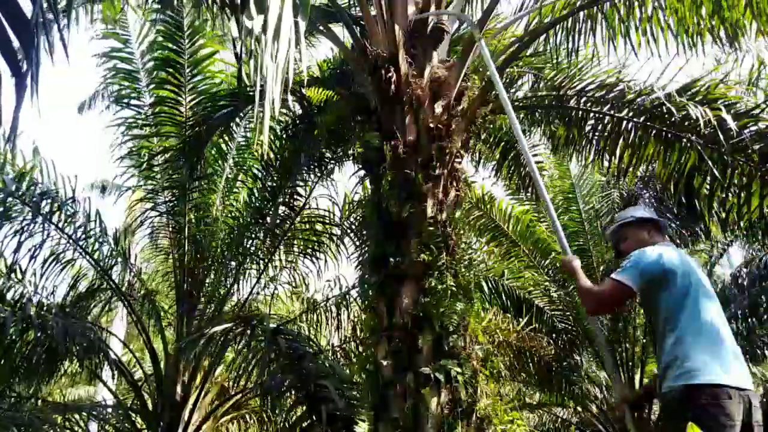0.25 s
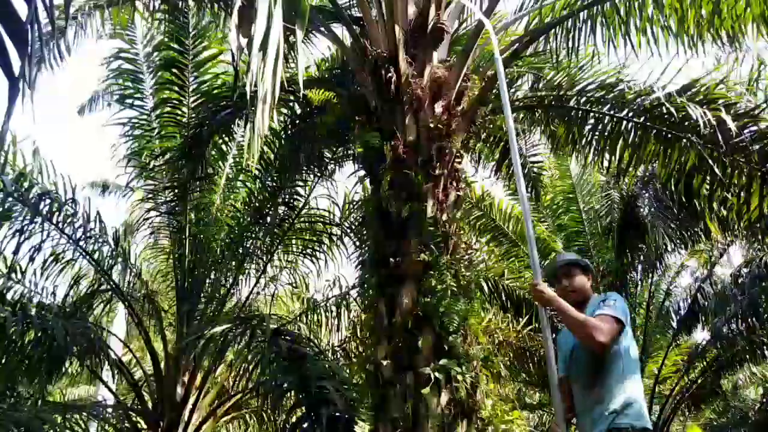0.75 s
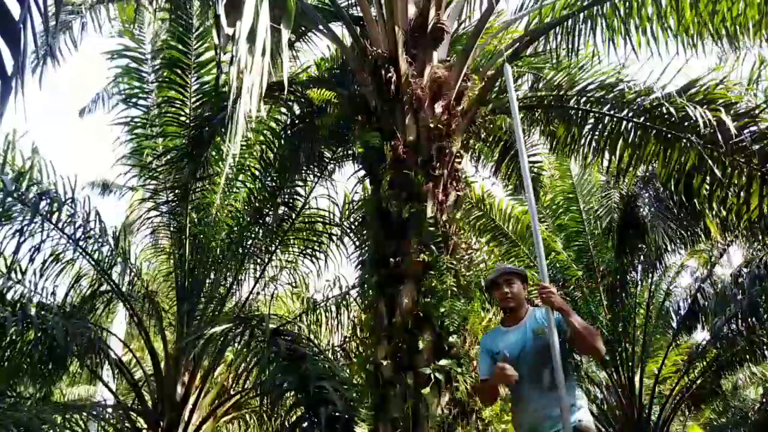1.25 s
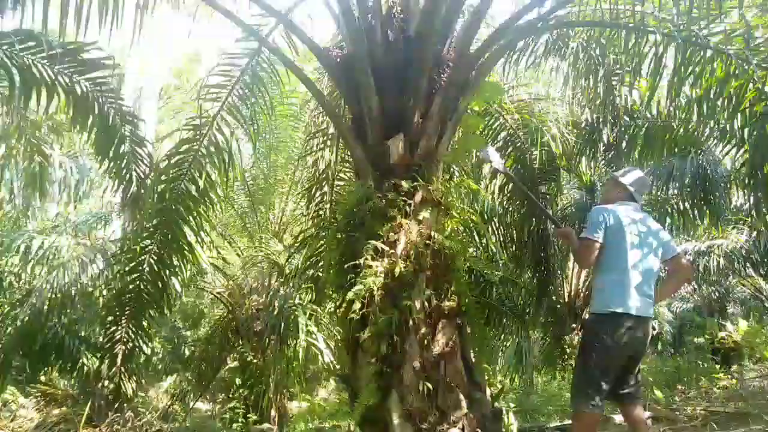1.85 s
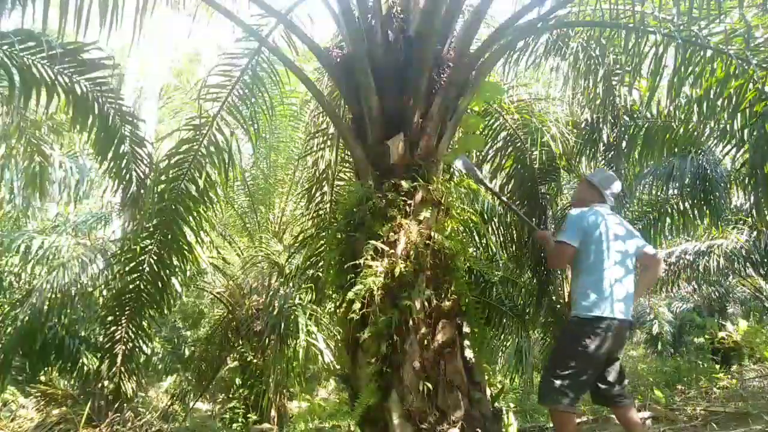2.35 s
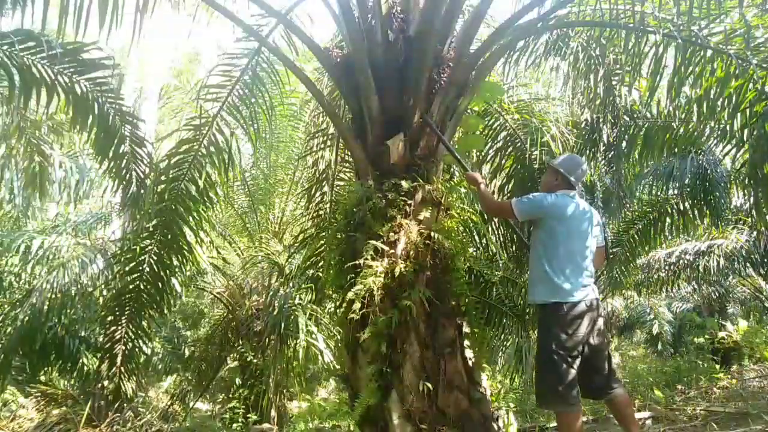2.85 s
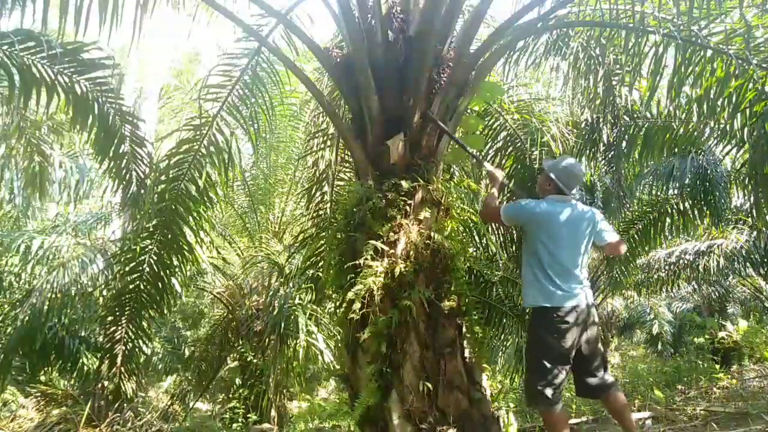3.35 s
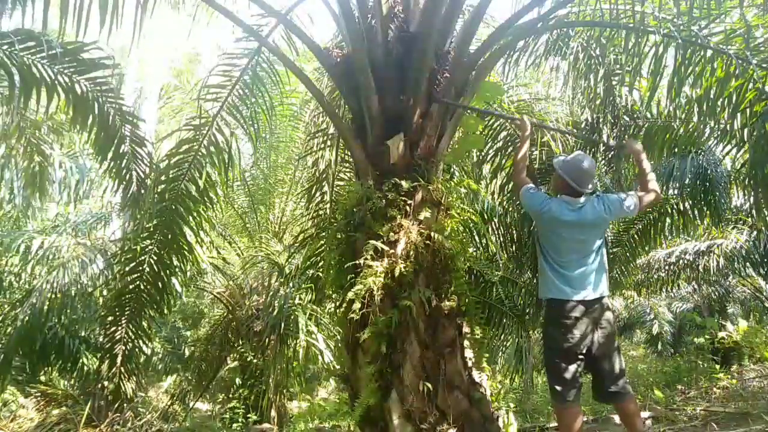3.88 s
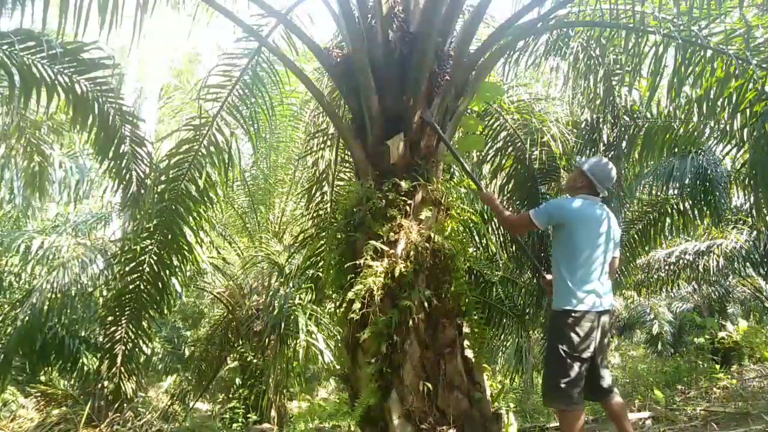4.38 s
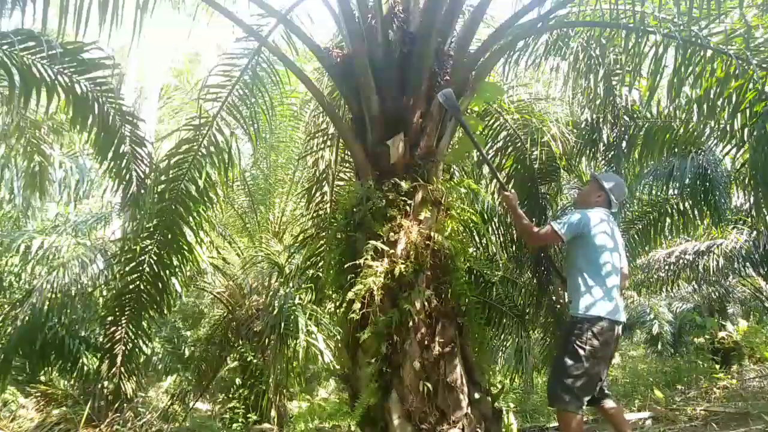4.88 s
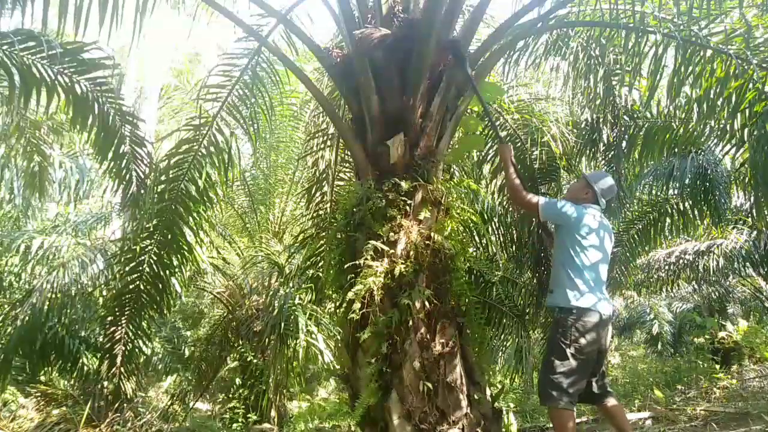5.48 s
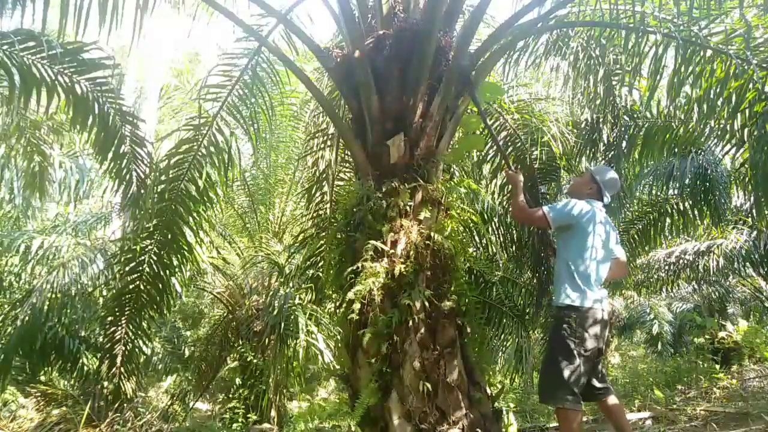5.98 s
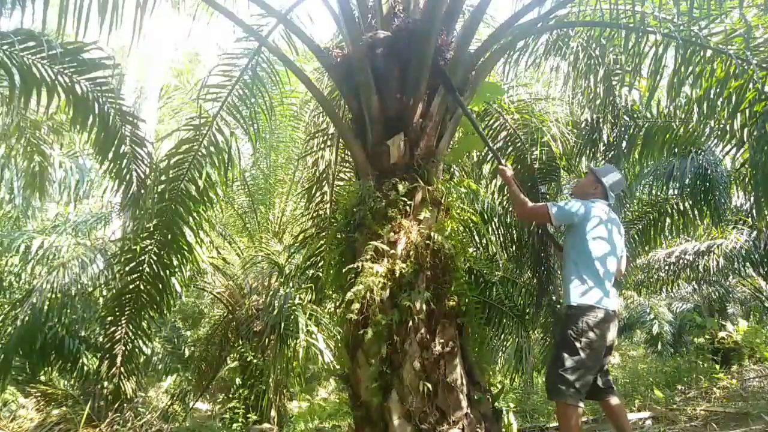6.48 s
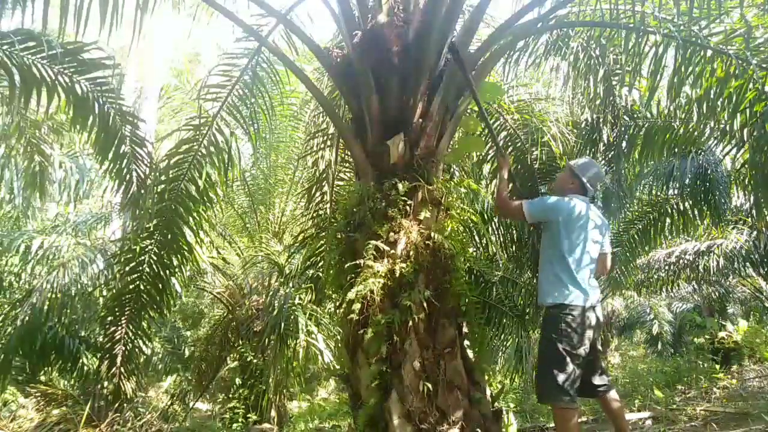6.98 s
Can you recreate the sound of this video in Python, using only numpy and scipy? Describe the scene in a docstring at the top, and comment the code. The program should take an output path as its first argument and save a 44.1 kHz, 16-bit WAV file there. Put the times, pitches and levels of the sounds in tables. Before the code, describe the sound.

Leafy rustling with thumps and a brief metallic clank cuts to near quiet, then a loud fibrous crunch, sharp cracks and frond swishes.

```python
"""Dry palm fronds hiss, scrape and crackle, built from random grains, as a long pole harvests two oil palms.
At the first tree a sickle pole is tugged down, with footfalls and a ringing knock of its metal tube.
Abruptly at the second, a chisel is driven into stalks: noise bursts crunch and crack, damped modes thud.
There the shaft's modes sing, a short bright tail answers the blows and two sines drone as a far engine.
Faint gliding tones whistle now and then, and each tree has its own bed of shaped noise."""
import sys
import numpy as np
from scipy import signal
from scipy.fft import rfft, irfft, next_fast_len
from scipy.io import wavfile

SR = 44100
rng = np.random.default_rng(int(sys.argv[2]) if len(sys.argv) > 2 else 0)


def wav_record(signal):
    """Record a signal, one row per channel, as 16-bit PCM in the file named by sys.argv[1]."""
    frames = np.transpose(np.atleast_2d(signal))
    bounded = np.clip(frames, -1, 1)
    # unit amplitude maps onto the largest positive 16-bit level
    quanta = np.round(bounded * 32767).astype(np.int16)
    wavfile.write(sys.argv[1], SR, quanta)


N = 318843
TIME = np.arange(N) / SR
CUT_S = 2.108   # the first tree gives way to the second


def from_db(db):
    """Decibels to gain."""
    return 10 ** (np.asarray(db) / 20)


def rms_one(x):
    """Scale a signal to rms 1."""
    return x / np.sqrt(np.mean(x ** 2) + 1e-20)


def at_hz(points, hz):
    """Read a table on a log-frequency axis."""
    points = np.array(points)
    return np.interp(np.log(hz + 1), np.log(points[:, 0]), points[:, 1])


def drift(rate):
    """Random drift: straight lines between knots of spread 1, at `rate` knots per second."""
    knots = rng.standard_normal(4000)
    return np.interp(TIME * rate, np.arange(len(knots)), knots)


def add(out, s, sound):
    """Mix a sound in at time s."""
    start = int(s * SR)
    out[:, start:start + sound.shape[-1]] += sound[..., :N - start]


# how alike left and right are: f/Hz, correlation (0 to 1)
STEREO_LIKENESS = [(900, 0.74), (3000, 0.22), (14000, 0.066)]


def spread(pair, gain_at):
    """Colour two unrelated signals and mix them to stereo, alike in the bass and apart in the treble; rms 1."""
    size = next_fast_len(pair.shape[-1])
    hz = np.fft.rfftfreq(size, 1 / SR)
    mid, side = rfft(pair, size) * gain_at(hz)
    alike = at_hz(STEREO_LIKENESS, hz)
    both = np.sqrt(1 + alike) * mid + np.sqrt(1 - alike) * side * [[1], [-1]]
    return rms_one(irfft(both, size)[:, :pair.shape[-1]])


def coloured(pair, spectrum):
    """Stereo sound with the given spectrum, rms 1."""
    return spread(pair, lambda hz: from_db(at_hz(spectrum, hz)))


def grains(per_s):
    """Tiny snaps at random moments, with normally distributed strengths drawn separately for two channels."""
    return (rng.random(N) < per_s / SR) * rng.standard_normal((2, N))


def resonance(hz, centre_hz, q):
    """Response of one damped resonance, 1 at its top."""
    return 1 / (1 + 1j * q * (hz / centre_hz - centre_hz / (hz + 1)))


def burst(gain_at, t60, rise_s):
    """A cascade of breaking fibres: coloured noise that rises fast and dies away."""
    t = np.arange(SR // 3) / SR
    noise = spread(rng.standard_normal((2, len(t))), gain_at)
    shape = from_db(-60 * t / t60) * (1 - np.exp(-t / rise_s))
    return rms_one(noise * shape) * np.sqrt(np.mean(shape ** 2))


def tick(gain_at, size=1024):
    """One clean fracture: a single pulse through the given response, peak 1."""
    pulse = irfft(gain_at(np.fft.rfftfreq(size, 1 / SR)))[:size // 2]
    return pulse / abs(pulse).max()


def ring(hz, t60):
    """One struck mode: a sine that starts at rms 1 and dies away."""
    t = np.arange(SR // 2) / SR
    return np.sqrt(2) * np.sin(2 * np.pi * hz * t) * from_db(-60 * t / t60)


def metal(hits, modes, t60):
    """Every knock sets all the modes ringing, each with a strength and a moment of its own."""
    out = np.zeros((2, N))
    for s, db in hits:
        for mode_hz, mode_db in modes:
            strength_db = db + mode_db + rng.normal(0, 4.4)
            delay_s = rng.random() / mode_hz   # up to one period
            add(out, s + delay_s, from_db(strength_db) * ring(mode_hz, t60))
    return out


def lean_left(x, lean_db, centre_hz=5200):
    """The treble around the centre is stronger on the left than on the right."""
    treble = signal.lfilter(*signal.iirpeak(centre_hz, 1.1, fs=SR), x)
    return x + treble * (from_db([[lean_db / 2], [-lean_db / 2]]) - 1)


def from_one_side(x, lag_s):
    """Sound from one side reaches the far channel late: the left for a positive lag, the right for a negative."""
    half = int(round(lag_s * SR / 2))
    return np.array([np.roll(x[0], half), np.roll(x[1], -half)])


# background spectrum at the first tree: f/Hz, relative level/dB per Hz
FIRST_BED = [(30, -23.5), (95, -3.5), (350, -22.5), (1500, -54.5), (5000, -35), (14000, -64.5)]


def first_air(level_db):
    """Steady noise bed of the first tree, shaped by its spectrum."""
    return from_db(level_db) * coloured(rng.standard_normal((2, N)), FIRST_BED)


# background spectrum at the second tree: f/Hz, relative level/dB per Hz
SECOND_BED = [(30, -28), (65, 1.5), (115, 6.5), (170, 1), (250, -13.5), (430, -43), (5000, -38),
              (9000, -47.5)]


def second_air(level_db):
    """Steady noise bed of the second tree, shaped by its spectrum."""
    return from_db(level_db) * coloured(rng.standard_normal((2, N)), SECOND_BED)


# far engine: t/s, f/Hz of its second harmonic, relative level/dB of that harmonic
ENGINE_COURSE = [(2.097, 143.8, -59), (5.499, 150.2, -51), (7.23, 152.5, -48.5)]


def engine(firing_db, second_db, waver_db):
    """Only the two lowest harmonics of the far engine carry through the trees."""
    s, hz, db = np.transpose(ENGINE_COURSE)
    phase = np.pi * np.cumsum(np.interp(TIME, s, hz)) / SR   # runs at half the second harmonic
    firing = from_db(firing_db + waver_db * drift(1.5)) * np.sin(phase)
    second_level_db = np.interp(TIME, s, db) + second_db + waver_db * drift(11)
    second = from_db(second_level_db) * np.sin(2 * phase)
    return np.sqrt(2) * (firing + second)


def grove(x, wet_db, t60, treble_t60):
    """Trunks and leaves scatter a thin, bright tail whose top dies first."""
    t = np.arange(SR * 3 // 4) / SR
    tails = [([(100, 3.0), (700, -5.0), (5000, 3.0), (9000, 0.0)], t60),
             ([(2000, -38.5), (5000, -9.5), (14000, -16.0)], treble_t60)]
    echo = 0
    for colour, decay in tails:
        echo = echo + coloured(rng.standard_normal((2, len(t))), colour) * from_db(-60 * t / decay)
    echo = echo * (1 - np.exp(-t / 0.00049))
    return from_db(wet_db) * signal.fftconvolve(x, rms_one(echo) / np.sqrt(len(t)), axes=1)[:, :N]


# faint whistles: t/s, length/s, starting f/Hz, share by which the pitch climbs, relative level/dB
FAINT_WHISTLES = [(0.137, 0.036, 1660, 0.079, -42), (3.916, 0.095, 761, 0.12, -61),
                  (4.189, 0.28, 1918, 0.06, -60.5), (5.149, 0.035, 1860, -0.042, -57)]


def whistles(waver, flicker_db):
    """Faint whistles, perhaps a far bird: thin, rough tones that glide a little, waver and break up."""
    out = np.zeros((2, N))
    for start, length, hz, glide, db in FAINT_WHISTLES:
        size = int(length * SR)
        climb = glide * np.sin(np.linspace(0, np.pi / 2, size))
        pitch = hz * (1 + climb + waver * drift(409)[:size])
        gain = rms_one(from_db(flicker_db * drift(86.2)[:size])) * signal.windows.tukey(size, 1 / 4)
        tone = np.sqrt(2) * np.sin(2 * np.pi * np.cumsum(pitch) / SR)
        add(out, start, from_db(db) * gain * tone)
    return out


# knocks on the metal tube: t/s, relative level/dB
TUBE_HITS = [(0.8378, -18), (0.843, -20), (0.912, -26.5)]
# modes of the tube: f/Hz, relative level/dB
TUBE_MODES = [(770, -21.5), (904, -16.5), (1368, -15), (1452, -16), (1630, -8.5), (1775, -13.5),
              (1900, -17.5), (2545, -9.5), (2995, -8.5), (3526, -11.5)]
# the tube is already ringing at the start: f/Hz, level/dB, t60/s
TUBE_LINGERING = (2923, -40.5, 0.48)


def pole(ring_t60, clatter_db, clatter_t60):
    """The blade clatters against the woody stalk and the tube rings briefly; one mode rings from the start."""
    out = metal(TUBE_HITS, TUBE_MODES, ring_t60)
    for s, db in TUBE_HITS:
        clatter = burst(lambda hz: resonance(hz, 1950, 0.61) ** 2, clatter_t60, 0.00035)
        add(out, s, from_db(db + clatter_db) * clatter)
    hz, db, t60 = TUBE_LINGERING
    add(out, 0, from_db(db) * ring(hz, t60))
    return out


# the chisel knocks against the trunk: t/s, relative level/dB
TRUNK_HITS = [(4.508, -55), (4.553, -53.5)]
# modes of its steel shaft, also sung by scraping(): f/Hz, relative level/dB
SHAFT_MODES = [(1540, -1.5), (2008, 3), (2915, 3)]


def chisel_knocks(t60):
    """The chisel meets the trunk and its steel shaft rings in a few modes."""
    return metal(TRUNK_HITS, SHAFT_MODES, t60)


def scraping(levels, slips_per_s, shaft_db, shaft_q, hollow_db, hollow_hz, hollow_q):
    """The chisel grates along the stalk in uneven slips: its shaft sings and the thick stalk base groans."""
    _, stalk, drag = levels
    slips = grains(slips_per_s)

    def shaft_response(hz):
        return sum(from_db(db) * resonance(hz, mode_hz, shaft_q) for mode_hz, db in SHAFT_MODES)
    shaft = spread(slips, shaft_response)
    hollow = spread(slips, lambda hz: resonance(hz, hollow_hz, hollow_q) ** 2)
    return from_db(stalk + shaft_db) * shaft + from_db(drag + hollow_db) * hollow


def taps(per_s, low_hz, high_hz, q, count=20):
    """Stalks bump together at random; each tap rings briefly at a woody pitch of its own; rms 1."""
    bumps, dealt = grains(per_s)[0], rng.integers(0, count, N)
    out = 0
    for k, hz in enumerate(np.geomspace(low_hz, high_hz, count)):
        struck = bumps * (dealt == k) + 1e-18
        out = out + signal.lfilter(*signal.iirpeak(hz, q, fs=SR), struck) / np.sqrt(hz)
    return rms_one(out)


def blows(rows, level_db, ring_db, q, t60, rise_s, dull_hz):
    """Soft, heavily damped blows: a few swings of one mode, and a dull crush around it."""
    out = np.zeros((2, N))
    for s, db, pitch_hz in rows:
        def colour(hz):
            return resonance(hz, pitch_hz, q) / (1 + (hz / dull_hz) ** 2)
        add(out, s, from_db(db + level_db) * burst(colour, t60, rise_s).mean(axis=0))
        swings = ring(pitch_hz, t60)
        add(out, s, from_db(db + ring_db) * swings * (1 - np.exp(-TIME[:len(swings)] / rise_s)))
    return out


# heavy thumps of feet and trunk: t/s, relative level/dB, f/Hz
THUMP_ROWS = [(0.287, -18.5, 86), (0.643, -23, 114), (0.842, -21, 97), (1.065, -19, 82.5), (1.84, -31, 104),
              (5.306, -25, 200), (5.735, -27.5, 260)]


def thumps():
    """Feet and trunk thump low: damped swings with little above the bass."""
    return blows(THUMP_ROWS, level_db=0.5, ring_db=-0.4, q=4, t60=0.083, rise_s=0.004, dull_hz=300.4)


# dull blows of pole and stalks: t/s, relative level/dB, f/Hz
KNOCK_ROWS = [(0.284, -16, 217), (0.282, -20, 557), (0.453, -21.5, 624), (0.645, -17, 950),
              (1.06, -13.5, 390), (1.562, -31.5, 672), (1.85, -28.5, 910), (1.926, -22.5, 596),
              (2.578, -0.5, 420), (2.826, -14.5, 390), (2.842, -14, 358), (3.641, -17.5, 526),
              (4.505, -20, 522), (4.555, -18, 243), (5.302, -3, 601), (5.313, -11, 356), (5.334, -23, 1130),
              (5.593, -20.5, 442), (5.726, -14, 1195), (5.736, -18, 516), (6.301, -27.5, 400),
              (6.354, -24, 266), (6.414, -24, 730), (6.574, -16.5, 284), (6.631, -18, 303),
              (7.216, -15.5, 800)]


def knocks():
    """Pole and stalks knock dully: short, woody swings in a crush of noise."""
    return blows(KNOCK_ROWS, level_db=-5.0, ring_db=-7, q=2.4, t60=0.038, rise_s=0.0054, dull_hz=1900)


# the chisel bursts through a stalk in jerks: t/s, relative level/dB, t60/s
CRUNCH_JERKS = [(2.539, -17.5, 0.08), (2.554, -13.5, 0.095), (2.579, -11, 0.039), (2.588, -10.5, 0.055),
                (2.599, -5.5, 0.021), (2.607, -19.5, 0.072)]
# spectrum of the crunch: f/Hz, relative level/dB per Hz
CRUNCH_SPECTRUM = [(45, -35.5), (85, -13), (230, -14.5), (330, -0.5), (470, -7), (950, -13.5), (1900, -9.5),
                   (4000, -11), (15000, -29.5)]


def crunch():
    """Wet, fibrous wood gives way in a quick run of bursts."""
    out = np.zeros((2, N))
    for s, db, t60 in CRUNCH_JERKS:
        jerk = burst(lambda hz: from_db(at_hz(CRUNCH_SPECTRUM, hz)), t60, 0.0017)
        add(out, s, from_db(db + 1.5) * jerk)
    return out


# fibres snapping: t/s, relative level/dB, f/Hz
FIBRE_SNAPS = [(0.2139, -14.5, 990), (0.4268, -20, 5400), (2.052, -23.5, 5520), (2.826, -23, 2148),
               (2.8449, -21, 2154), (3.366, -29, 2120), (3.4305, -30, 2750), (3.5544, -25.5, 2980),
               (3.615, -10, 2180), (3.619, -23, 1800), (3.8072, -28.5, 2600), (4.337, -35, 3980),
               (4.4155, -28.5, 1050), (4.506, -34, 2290), (4.552, -26, 2270), (5.0445, -35, 2460),
               (5.3015, -9.5, 1430), (5.312, -8.5, 2150), (5.3357, -11.5, 5900), (5.4499, -12, 2153),
               (5.5249, -13.5, 2540), (5.7333, -9, 1470), (6.6653, -12, 2220), (6.796, -20.5, 3400),
               (6.8403, -14.5, 1490), (6.9742, -13, 5500), (6.992, -14.5, 2370), (7.0267, -6.5, 2500),
               (7.219, -7, 3340)]


def cracks(level_db, q, splinter_db, splinter_hz, snap_db, t60, gap_s, count=4):
    """Snaps ring the stalk and throw off splinters; high-pitched dry fibres part in a run of sharp ticks."""
    out = np.zeros((2, N))
    for s, db, pitch_hz in FIBRE_SNAPS:
        def colour(hz):
            splinters = from_db(splinter_db) * resonance(hz, splinter_hz, 1)
            return resonance(hz, pitch_hz, q) ** 2 + splinters
        add(out, s, from_db(db + level_db) * burst(colour, t60, 0.0012))
        if pitch_hz <= 2150:
            continue
        for k, delay in enumerate(np.cumsum(gap_s * rng.uniform(0.62, 1.8, count))):
            gain = from_db(db + snap_db - 3.4 * k) * rng.choice([-1, 1])
            add(out, s + delay, gain * tick(colour))
    return out


def haul(s, length, db, slackening):
    """Gain of one haul: it takes up quickly, slackens or builds while it lasts, then the frond settles."""
    attack_s, release_db_per_s = 0.032, 148
    t = TIME - s
    fall_db = slackening * np.clip(t, 0, length) + release_db_per_s * np.maximum(t - length, 0)
    return np.clip(t / attack_s, 0, 1) * from_db(db - fall_db)


def tug(s, db, rise_s):
    """Gain of one tug: the frond speeds up, then springs to rest."""
    release_db_per_s = 225.5
    t = TIME - s
    return np.clip(1 + t / rise_s, 0, 1) * from_db(db - release_db_per_s * np.maximum(t, 0))


# a frond is hauled and keeps moving: t/s, length/s, leaflet hiss level/dB,
# slackening/(dB/s, negative builds), stalk scrape and dull dragging level/dB above the hiss
FROND_HAULS = [(0, 1.11, -49.5, -1.5, 1, 0.5), (1.128, 0.23, -62, -2.5, -3, 8.5),
               (1.544, 0.1, -60.5, 22, -3.5, 6.5), (1.746, 0.33, -55.5, -13.5, -4, 0.5),
               (3, 0.29, -72.5, -25, -19, -37), (3.375, 0.37, -56, -3, 5, 12.5),
               (3.577, 0.2, -39.5, 51, 4, -0.5), (3.84, 0.36, -57, 9, -3.5, -38),
               (4.228, 0.39, -58, -5.5, -1.5, -1.5), (4.637, 0.38, -63, 11.5, -12, -21.5),
               (5.114, 0.16, -60.5, -16, -7.5, -34), (5.294, 0.64, -43.5, 6.5, 1, 4),
               (5.769, 0.71, -41.5, 7.5, 0, 3), (6.516, 0.32, -45, -9.5, 2.5, 0.5),
               (6.888, 0.39, -47, 7, 0.5, -0.5)]
# a quick tug swishes the leaflets past the pole: t/s of its height, leaflet hiss level/dB, rise/s,
# stalk scrape and dull dragging level/dB above the hiss
FROND_TUGS = [(0.004, -38.5, 0.013, 3, -9), (0.225, -40.5, 0.023, 4, 1.5), (0.29, -40, 0.071, 1, 2),
              (0.434, -37.5, 0.041, -8, 0), (0.649, -41, 0.04, 0, 0), (1.081, -52, 0.044, 7, 17.5),
              (4.012, -47.5, 0.035, 0.5, -22.5), (5.049, -45.5, 0.0079, -10.5, -41),
              (5.882, -42.5, 0.055, -2, 8.5), (6.453, -38, 0.054, -0.5, -9), (6.577, -40, 0.021, 3.5, 6.5),
              (6.984, -32.5, 0.021, -5, -27)]


def motion(start, end):
    """Levels in dB of hiss, scrape and dragging at one tree: its hauls and tugs add in power."""
    powers = np.zeros((3, N))
    for shape, rows in ((haul, FROND_HAULS), (tug, FROND_TUGS)):
        for s, *gesture, scrape_db, drag_db in rows:
            if start <= s < end:
                powers += np.outer(from_db([0, scrape_db, drag_db]), shape(s, *gesture)) ** 2
    return 10 * np.log10(powers * (TIME < end) + 1e-20)


def patchy(x, depth_db, changes_per_s, count=30):
    """Leaves and stalks of every size take turns: each narrow band swells and fades by itself."""
    size = next_fast_len(N)
    spectrum, hz = rfft(x, size), np.fft.rfftfreq(size, 1 / SR)
    place = np.interp(np.log(hz + 1), np.log([200, 12000]), [0, count - 1])
    # countless small leaflets average out, so the treble stays steadier
    depths = depth_db * (1 - np.linspace(0, 1, count) ** 3)
    out = 0
    for k, db in enumerate(depths):
        band = irfft(spectrum * np.maximum(1 - abs(place - k), 0), size)[:, :N]
        out = out + band * rms_one(from_db(db * drift(changes_per_s)))
    return out


# frond spectra, all: f/Hz, relative level/dB per Hz
LEAFLET_HISS = [(1800, -26.5), (3300, -7.5), (4800, -2.5), (8500, -11), (14500, -22)]
STALK_SCRAPE = [(700, -27), (1300, -15.5), (1900, -12), (3000, -14.5), (8000, -28)]
DULL_DRAG = [(90, -2), (230, 3), (420, 1.5), (750, -2.5), (1150, -6), (3000, -33.5)]


def rustle(levels, leaf_db, stalk_db, drag_db, snaps_per_s, flutter_db):
    """Leaflets flick, stalks scrape and drag, twigs crackle; harder motion makes faster, brighter grains."""
    leaf, stalk, drag = levels
    vigour = from_db(.3 * (leaf + 43))
    per_s = snaps_per_s * vigour

    def layer(db, colour, rate):
        steady = grains(rate) / np.sqrt(rate)   # equal power at any grain rate
        return from_db(db + flutter_db * drift(90)) * coloured(steady, colour)
    hiss = layer(leaf + leaf_db, LEAFLET_HISS, per_s)
    soft = signal.sosfiltfilt(signal.butter(2, 7500, fs=SR, output="sos"), hiss)
    leaflets = soft + vigour * (hiss - soft)
    crackle = layer(stalk - 9.5, STALK_SCRAPE, 170)   # dry twigs, at a constant grain rate
    scrape = layer(stalk + stalk_db, STALK_SCRAPE, per_s)
    dragging = layer(drag + drag_db, DULL_DRAG, per_s * 0.3)
    return leaflets + crackle + scrape + dragging


def scene():
    """Blows and rustle at the first tree, then at the second, each with its own background."""
    hits = cracks(level_db=-11.5, q=1.11, splinter_db=-10.0, splinter_hz=3900, snap_db=1.0,
                  t60=0.054, gap_s=0.0008)
    hits = hits + crunch() + knocks() + thumps()
    hits = lean_left(hits, lean_db=6.0) + chisel_knocks(t60=0.24)
    clank = pole(ring_t60=0.18, clatter_db=-2, clatter_t60=0.21)

    pulling, chiselling = motion(0, CUT_S), motion(CUT_S, N / SR)
    fronds = rustle(pulling, leaf_db=0.0, stalk_db=1.5, drag_db=0.0, snaps_per_s=11000, flutter_db=1.37)
    fronds = fronds + rustle(chiselling, leaf_db=-0.5, stalk_db=-0.86, drag_db=-7.0,
                             snaps_per_s=6000, flutter_db=2.5)
    fronds = lean_left(patchy(fronds, depth_db=5.5, changes_per_s=60), lean_db=11.5)
    tap_gain = from_db(np.maximum(pulling[1], chiselling[1]) - 11)   # follows the stalk scrape
    wood = tap_gain * taps(per_s=70, low_hz=458, high_hz=3400, q=17)
    wood = wood + scraping(chiselling, slips_per_s=200, shaft_db=-11.5, shaft_q=17,
                           hollow_db=-12.5, hollow_hz=400, hollow_q=2.7)
    both_trees = hits + wood + whistles(waver=0.026, flicker_db=8) + fronds

    # at the first tree the worker stands to the right, the blade is a little to the left
    first = from_one_side(both_trees + first_air(level_db=-51.0), lag_s=.00023)
    first = first + from_one_side(clank, lag_s=-.00009)
    tail = grove(hits * (TIME > CUT_S), wet_db=-13.5, t60=0.62, treble_t60=0.25)
    second = both_trees + lean_left(tail, lean_db=5.5) + second_air(level_db=-56.5)
    second = second + engine(firing_db=-62.5, second_db=-3.0, waver_db=2.5)
    return np.where(TIME < CUT_S, first, second) * from_db([[-.5], [.5]])   # right a little louder


def record(dry):
    """The microphone drops the deepest bass, peaks are clipped and the top is cut."""
    thin = signal.sosfilt(signal.butter(3, 52, "high", fs=SR, output="sos"), dry)
    top_cut = signal.ellip(10, .2, 70, 14400, fs=SR, output="sos")
    return signal.sosfilt(top_cut, np.clip(thin, -1, 1))


dry = scene()
out = record(dry)
wav_record(out)
```